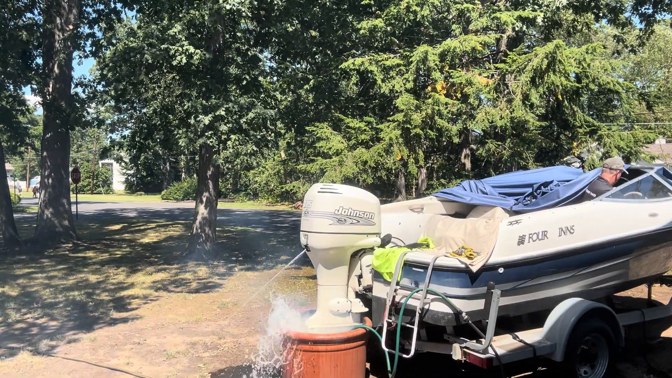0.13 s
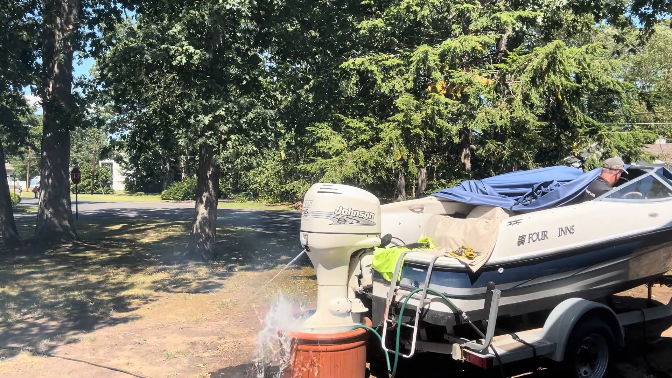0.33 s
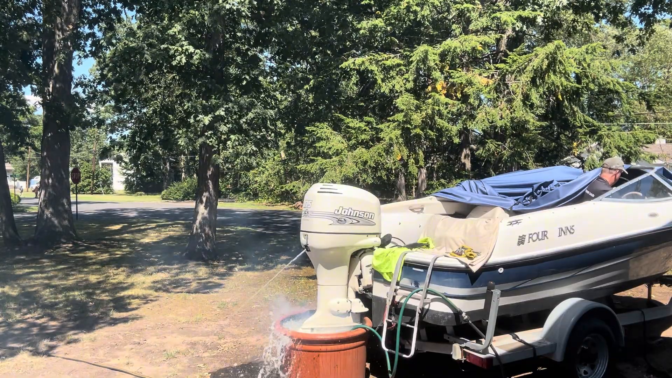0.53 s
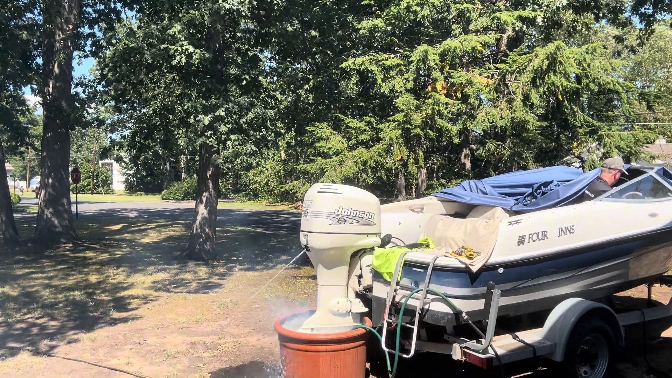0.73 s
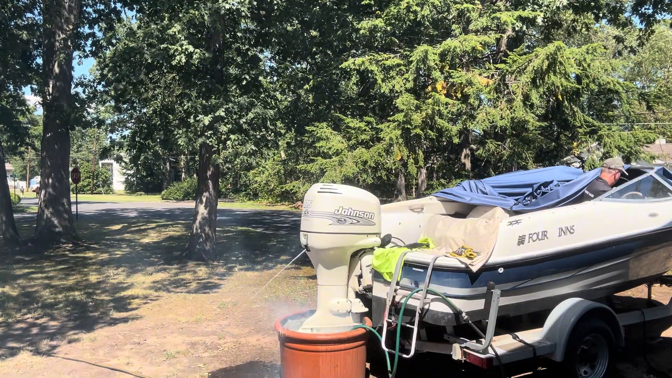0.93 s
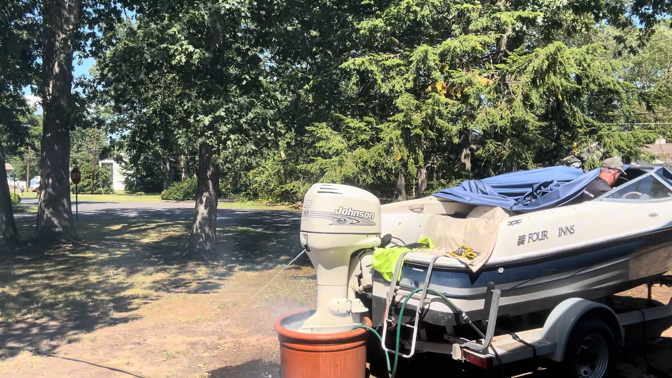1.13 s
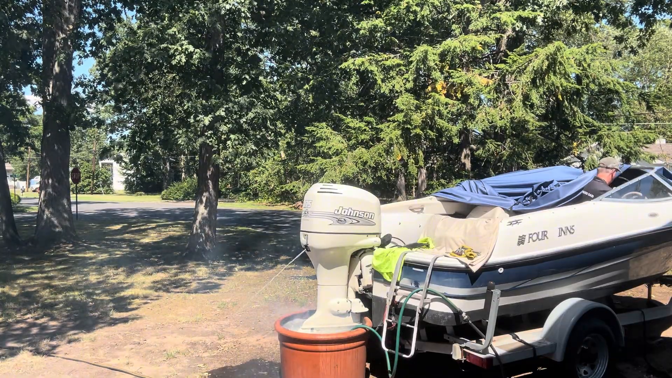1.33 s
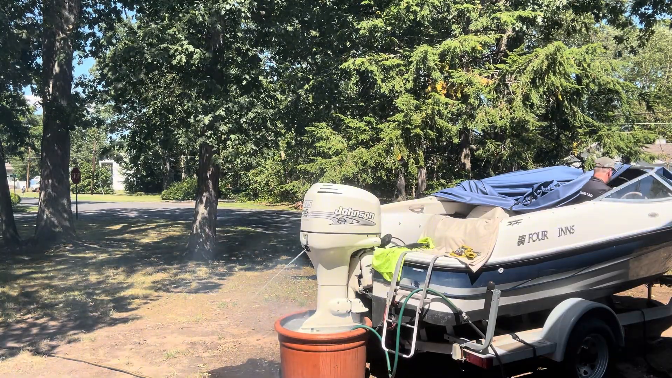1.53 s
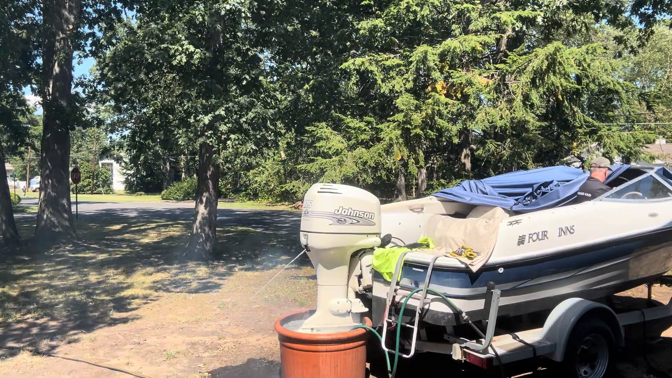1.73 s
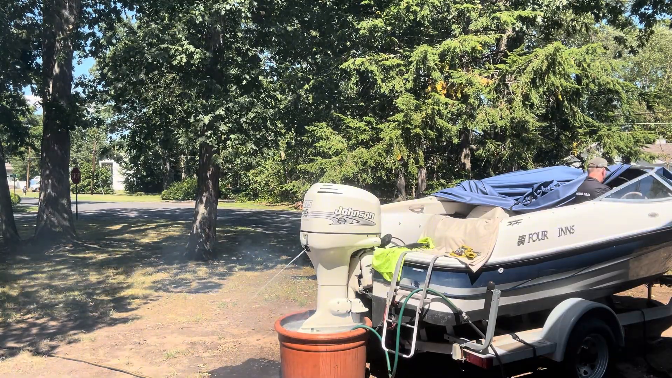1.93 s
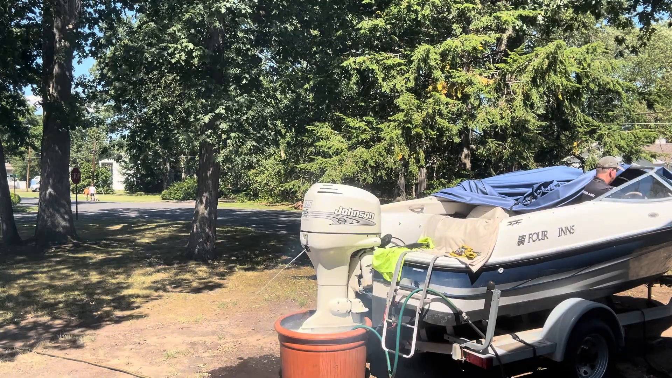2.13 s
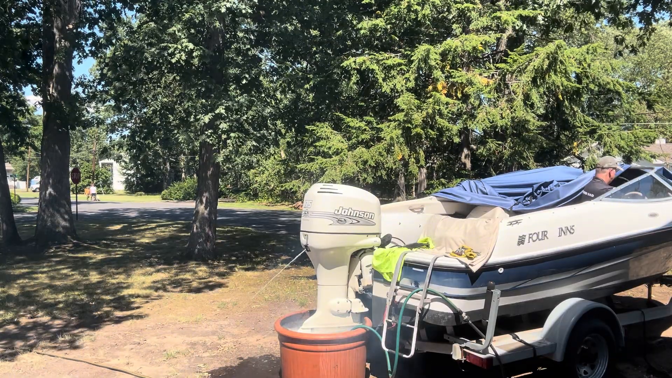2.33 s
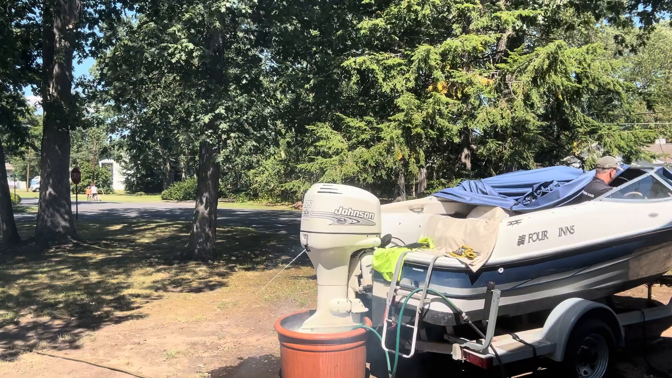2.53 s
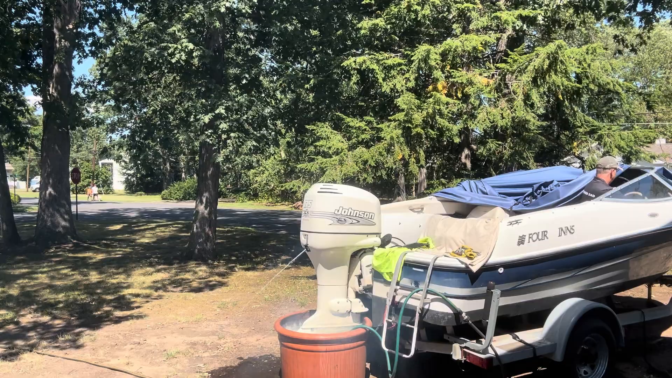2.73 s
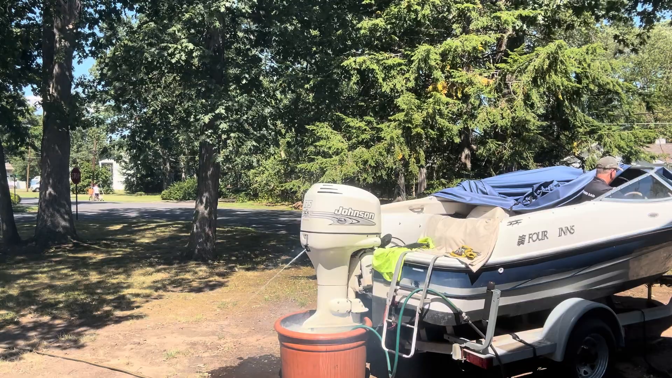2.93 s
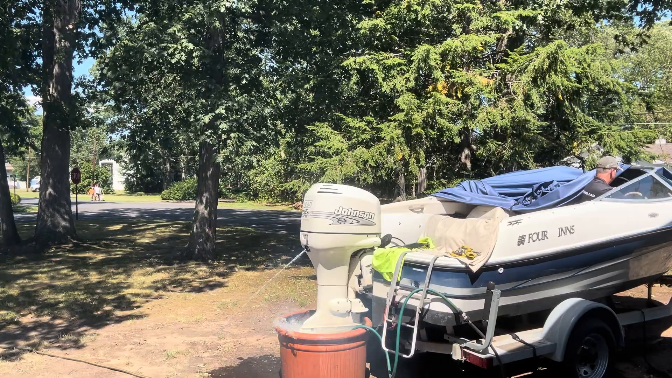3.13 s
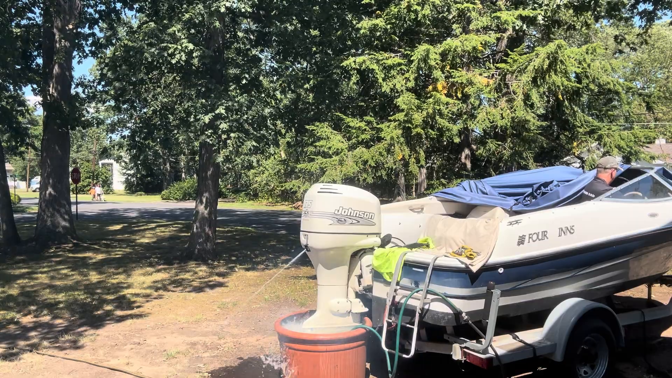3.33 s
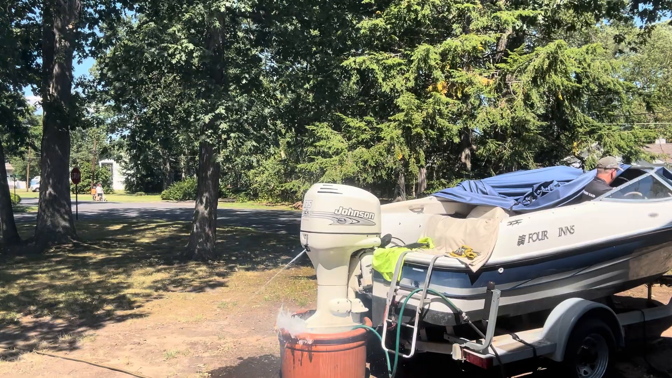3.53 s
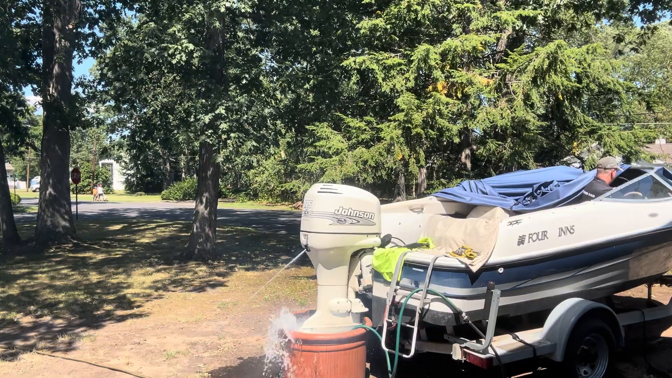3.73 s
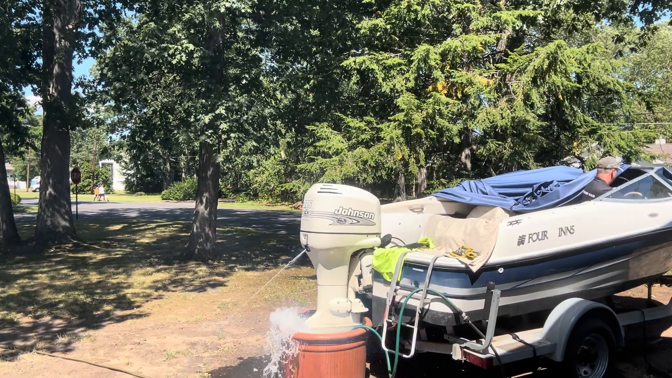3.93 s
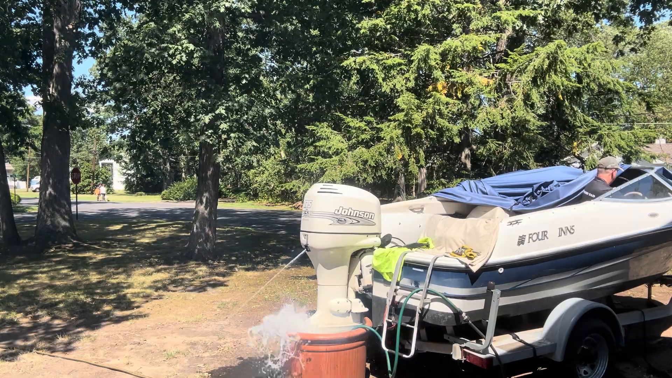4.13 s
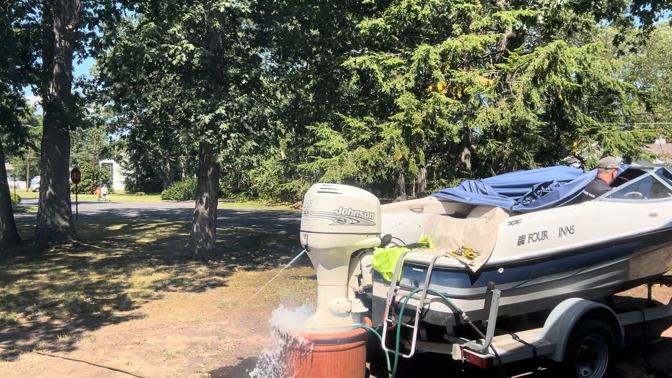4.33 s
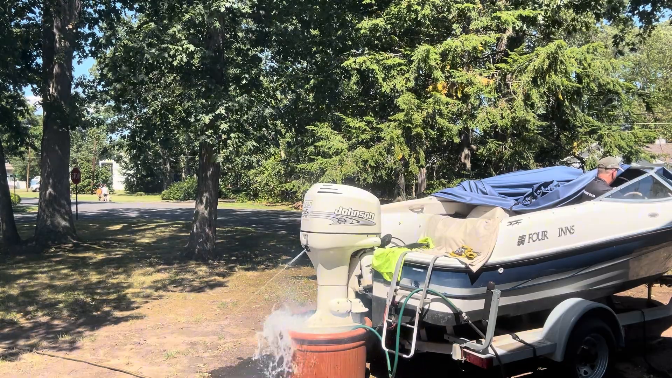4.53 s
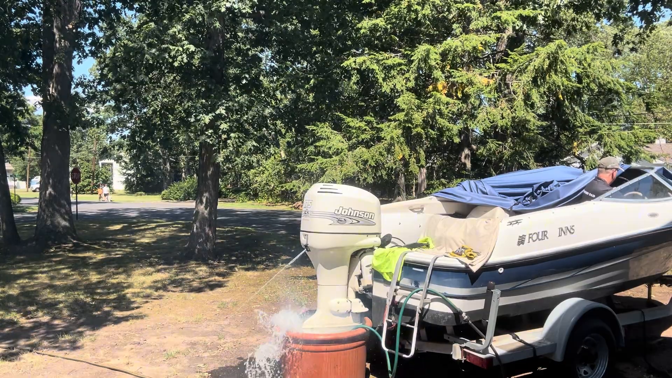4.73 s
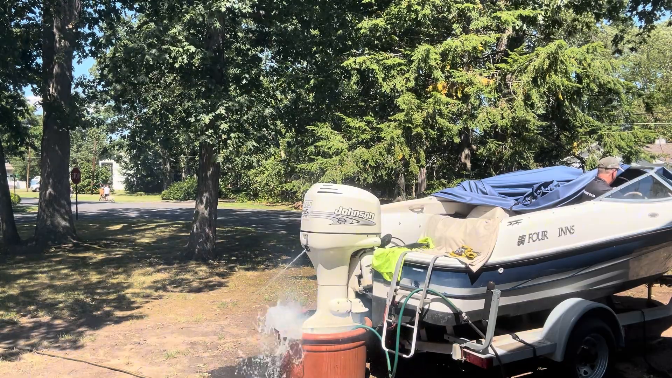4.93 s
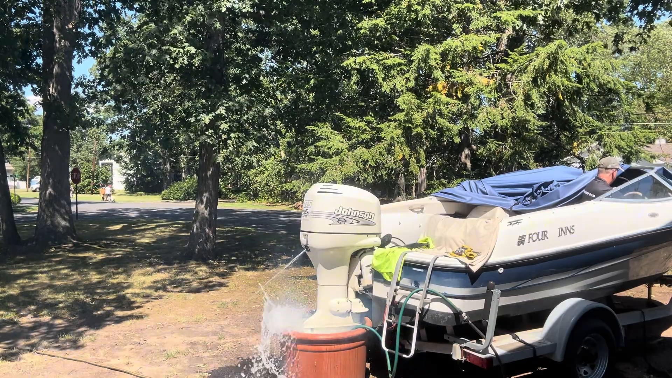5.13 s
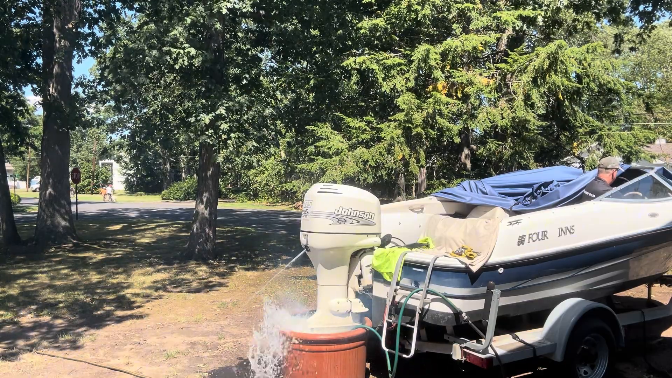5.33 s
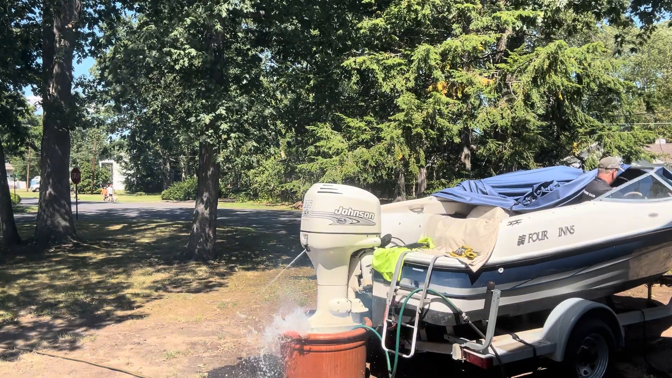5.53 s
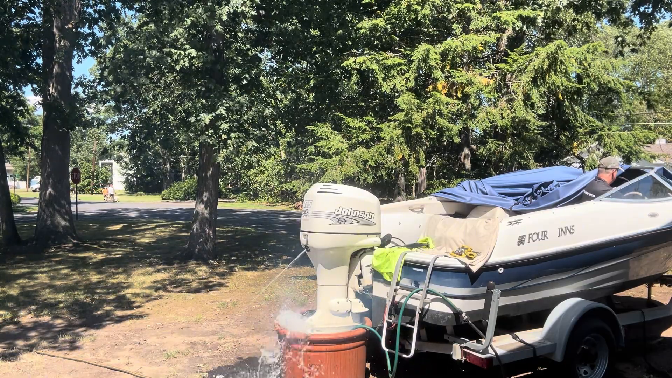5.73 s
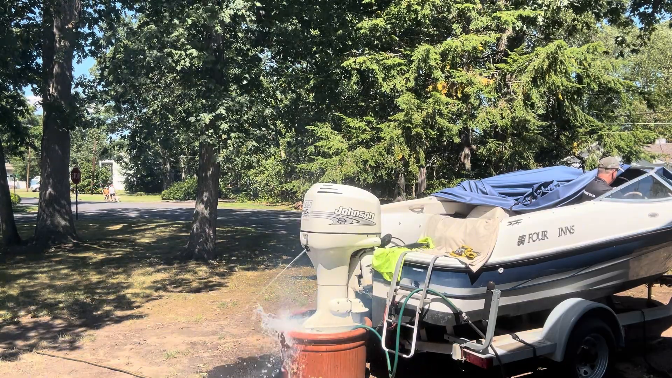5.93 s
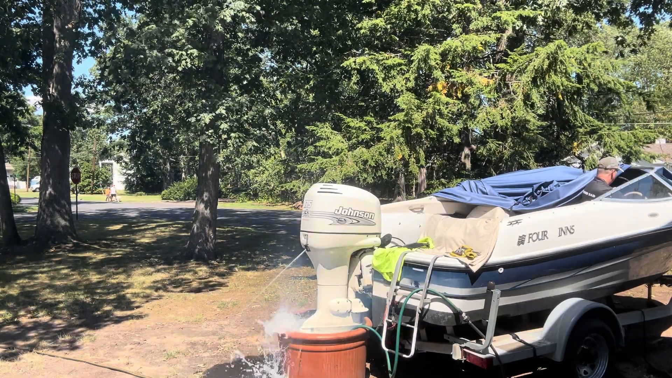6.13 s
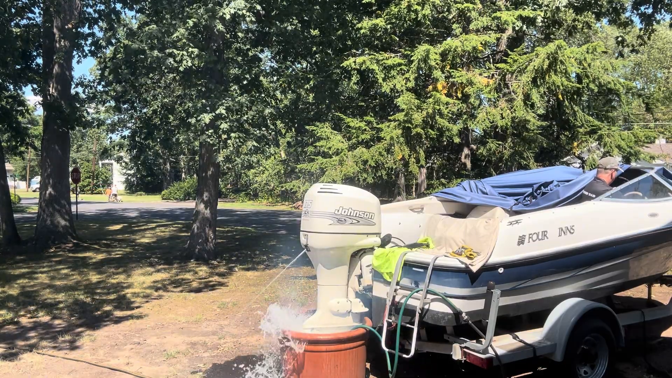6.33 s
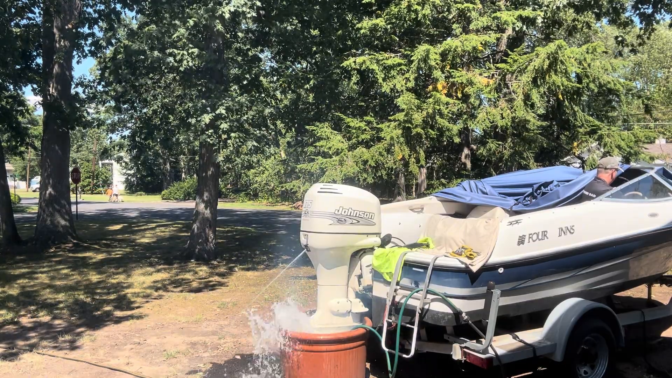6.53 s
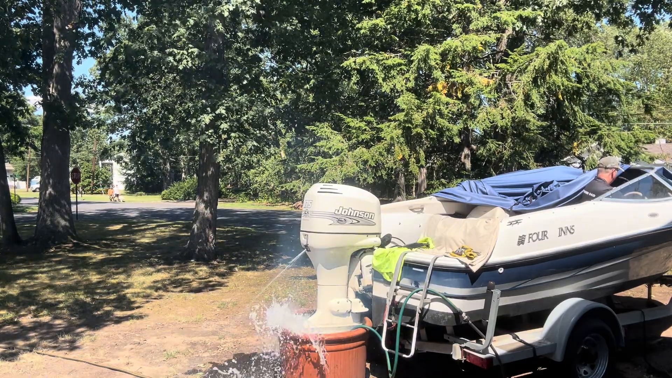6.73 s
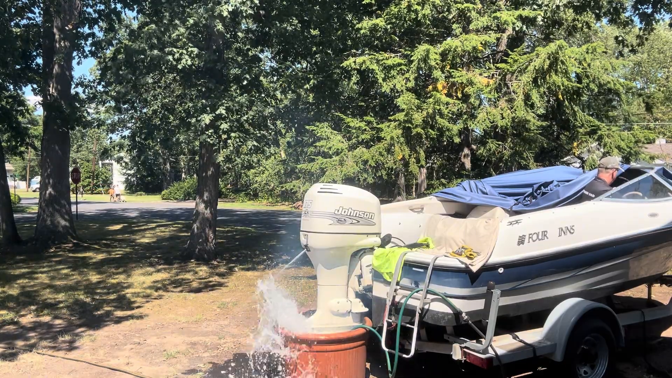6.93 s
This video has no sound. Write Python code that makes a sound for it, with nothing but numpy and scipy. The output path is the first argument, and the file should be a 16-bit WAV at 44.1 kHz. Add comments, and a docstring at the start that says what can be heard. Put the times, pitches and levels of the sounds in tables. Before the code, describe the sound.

A two-stroke outboard motor runs in a barrel of water outdoors, with a low, bubbling exhaust boom, a mechanical whirr and almost no echo. It starts fast, with gulps and splashes, then slows, giving one sharp clack at 0.6 seconds. Until about 2.5 seconds it idles in lumpy chugs with light ticks. A soft, hollow double knock comes at 2.1 seconds, followed by a very faint, high, chirping squeal until 3.2. The engine picks up from 2.5 seconds and holds a wavering middle speed from 3.5, with repeated big gulps, churning water and short splashes. A loose metal part jingles lightly from 3.7 to 4.6 seconds and again from 5.6 to 6.2. At about 6.4 seconds the engine revs hard, the exhaust blowing clear in loud growling surges while water slaps and sprays, just easing near 7 seconds.

```python
"""In a yard, a six-cylinder two-stroke outboard runs in a barrel of water: it idles, picks up, and revs.
Its exhaust booms and gulps under water, the water churns and sprays, and the block whirrs and ticks.
One sharp clack comes as the engine drops to idle, then a hollow double knock and a faint squeal.
At middle speed a loose metal part jingles; in the last rev the exhaust blows clear and growls."""
import sys
import numpy as np
from scipy import signal
from scipy.fft import rfft, irfft, next_fast_len
from scipy.io import wavfile
from scipy.ndimage import uniform_filter1d

SR = 44100
rng = np.random.default_rng(int(sys.argv[2]) if len(sys.argv) > 2 else 0)


def dump_mix(stems):
    """Bounce the given channels to the path in sys.argv[1] as a 16-bit WAV at rate SR."""
    frames = np.atleast_2d(stems).T  # one column per channel
    limited = np.clip(frames, -1, 1)  # hard clip at full scale
    pcm = np.round(limited * 32767).astype(np.int16)
    wavfile.write(sys.argv[1], SR, pcm)


N = 307377
TIME = np.arange(N) / SR
CYLINDERS = 6

# big gulps of gas breaking the surface: (time [s], relative level [dB], starting pitch [Hz])
GULPS = [(0.067, -24.5, 208), (.172, -30, 204), (2.211, -33, 209), (3.318, -30.5, 179), (3.372, -29, 168),
         (3.451, -28, 169.4), (3.577, -24.5, 168.2), (3.82, -29.5, 170.2), (3.92, -25.5, 171.5),
         (4.013, -34, 179), (4.08, -26.5, 173.4), (4.29, -22, 183.4), (4.627, -23.5, 181),
         (4.809, -29, 181.7), (4.897, -30, 177.3), (4.939, -23, 179), (5.098, -21.5, 189.6),
         (5.437, -26.5, 179.2), (5.602, -27.5, 177), (5.797, -27.5, 180.5), (6.001, -25.5, 184.5),
         (6.386, -21.5, 191.9), (6.487, -23.5, 187.3), (6.658, -25.5, 190.2), (6.694, -27, 194.8),
         (6.855, -19, 170)]
# tone of the barrel's gas pocket when the engine works hard: (frequency [Hz], level [dB])
WORKING_BOOM = [(40, -36), (72, -13.5), (130, -21.5), (160, 0), (180, -2.5), (203, -2.5), (233, -10.5),
                (280, -7.5), (332, -13.5), (365, -15), (415, -21), (600, -48), (1200, -86)]
# tone of churning water: (frequency [Hz], level [dB])
CHURN_TONE = [(200, -13), (410, 0), (485, 2.5), (568, 10), (645, -2), (800, -0.5), (900, -5), (1020, 0),
              (1100, -11.5), (1225, -4.5), (1400, -39.5), (2000, -23.5), (4000, -70.5)]


def gain_of(db):
    """Turns decibels into a number to multiply a sound by."""
    return 10 ** (np.asarray(db) / 20)


def evened(x):
    """Scales a sound to an average strength (rms) of 1."""
    return x / np.sqrt(np.mean(x ** 2) + 1e-20)


def look_up(x, rows):
    """Reads a two-column table at x, along straight lines between its rows."""
    return np.interp(x, *np.transpose(rows))


def colour(x, tone):
    """Shapes a sound by (frequency [Hz], level [dB]) points, then evens it to strength 1."""
    hz, db = np.transpose(tone)
    size = next_fast_len(len(x))
    freqs = np.fft.rfftfreq(size, 1 / SR)
    gains = gain_of(np.interp(np.log(freqs + 1), np.log(hz), db))
    return evened(irfft(rfft(x, size) * gains, size)[:len(x)])


def wander(rate):
    """A smooth random wobble that changes up to about `rate` times a second."""
    freqs = np.fft.rfftfreq(4096, 1 / 400)
    slow = evened(irfft(rfft(rng.standard_normal(4096)) / (1 + (freqs / rate) ** 4)))
    return np.interp(TIME, np.arange(4096) / 400, slow)


def steadied(x, seconds, share):
    """Takes a share of the slow swells out of a sound."""
    power = uniform_filter1d(x ** 2, int(seconds * SR))
    power = uniform_filter1d(power, int(seconds * SR / 2))
    return evened(x / (abs(power) + 1e-6) ** (share / 2))


def grains(per_s, spread_db):
    """A stream of random clicks, most small and a few large."""
    size = gain_of(spread_db * np.minimum(rng.exponential(1, N), 4))
    return evened(size * rng.choice([-1, 1], N) * (rng.random(N) < per_s / SR))


def ring(notes, t, scatter_db):
    """The fading notes of a struck object; each blow shares its force among them a little differently."""
    return sum(gain_of(db + scatter_db * rng.standard_normal() - 60 * t / fade_s)
               * np.sin(2 * np.pi * (hz * t + rng.random())) for hz, db, fade_s in notes)


def bell(s, width_s):
    """A smooth swell of height 1 around time s."""
    return np.exp(-np.minimum(((TIME - s) / width_s) ** 2, 20))


def add(mix, s, sound):
    """Mixes a sound in at time s."""
    part = mix[max(round(s * SR), 0):][:len(sound)]
    part += sound[:len(part)]


def by_speed(revs, cruise_db, below_db, above_db):
    """A level that changes per doubling of speed: by below_db under cruising speed, above_db over it."""
    return cruise_db + below_db * np.minimum(revs, 0) + above_db * np.maximum(revs, 0)


def puffs(turns, length, floor, uneven_db):
    """An uneven puff of noise at each firing, over a steady floor; length is a share of the firing gap."""
    firing = turns * CYLINDERS
    count = firing.astype(int)
    chance = np.clip(rng.standard_normal(N), -2, 2)[count]
    cylinder_bias = 0.88 * np.cos(2 * np.pi * count / CYLINDERS)
    pulse = gain_of(uneven_db * (chance + cylinder_bias)) * np.exp(-(firing % 1) / length)
    return evened((floor + pulse) * rng.standard_normal(N))


def engine_tones(turns, speed, revs, boom_db):
    """The engine rocks on its mounts once a turn; higher exhaust tones flutter through the water."""
    # the rocking: (speed [turns/s], level [dB])
    shake = [(17, -73), (25, -65), (30, -53.5), (34, -51), (39, -38.5), (44, -49), (53, -44)]
    # exhaust tones: (cycles per turn, relative level [dB], gain per doubling of speed [dB])
    tones = [(5, -12.5, -4.5), (6, -2, -1.5), (9, -8, 7), (12, -6.5, -2)]
    out = gain_of(look_up(speed, shake)) * evened(np.sin(2 * np.pi * turns))
    for multiple, db, rise_db in tones:
        flutter = 0.53 * (wander(17) + 1j * wander(16))  # wobbles both level and timing
        tone = ((1 + flutter) * np.exp(2j * np.pi * (multiple * turns + rng.random()))).real
        gas_pocket_db = 0.56 * look_up(multiple * speed, WORKING_BOOM)
        out += gain_of(boom_db + db + rise_db * revs + gas_pocket_db) * evened(tone)
    return out


def exhaust(turns, revs, boom_db):
    """Firings make the exhaust housing drone and the pocket of gas in the barrel boom."""
    # tones of the idling boom and of the housing: (frequency [Hz], level [dB])
    idle_boom = [(60, -40), (125, -4), (142, -16.5), (170, -9), (200, 1.5), (236, -14), (283, -6.5),
                 (330, -19), (368, -8), (410, -27), (600, -29), (1200, -78.5)]
    drone_tone = [(20, -43), (37, -7), (52, -21), (72, -10), (82, -19.5), (94, -3), (103, 5), (112, -4),
                  (124, -3.5), (138, -15), (170, -28), (400, -68.5)]
    # how loud the housing drones: (time [s], relative level [dB])
    drone_levels = [(0, -34.5), (.5, -40), (1.25, -42.5), (2.35, -41.5), (2.55, -46), (3.0, -41.5),
                    (4.35, -44.5), (4.6, -36.5), (6.1, -42), (6.55, -31.5), (6.97, -35.5)]
    load = np.clip(1 + revs / 0.705, 0, 1)  # 0 at idle, 1 from cruising speed up
    idle = colour(puffs(turns, length=0.16, floor=0.35, uneven_db=1.5), idle_boom)
    working = colour(puffs(turns, length=0.22, floor=0.18, uneven_db=3.5), WORKING_BOOM)
    boom = steadied(np.sqrt(1 - load) * idle + np.sqrt(load) * working, seconds=0.055, share=1)
    housing = colour(puffs(turns, length=0.23, floor=0.38, uneven_db=2), drone_tone)
    drone = steadied(housing, seconds=0.17, share=0.37)
    # at idle the gas escapes unevenly
    lumpiness = gain_of(2 * (1 - load) * np.sin(2 * np.pi * turns * 2 / 3 + 1.546 * wander(11.7)))
    return lumpiness * (gain_of(boom_db - 1) * boom + gain_of(look_up(TIME, drone_levels) - 3) * drone)


def block(turns, revs):
    """Pistons and bearings whirr, louder with speed; at high speed the firings make the cover rasp."""
    # tone of the moving parts: (frequency [Hz], level [dB])
    whirr_tone = [(500, -17), (1200, 8), (1600, 2.5), (1900, -4), (2300, 3), (2650, -4.5), (3100, -9),
                  (4000, -13.5), (6000, -17.5), (9000, -35), (16000, -53)]
    whirr = colour(puffs(turns, length=0.98, floor=1, uneven_db=2.5), whirr_tone)
    cover = signal.iirpeak(2320, Q=5.5, fs=SR)  # the cover rings at 2320 Hz
    firings = puffs(turns, length=0.2, floor=0.12, uneven_db=5.5)
    rasp = evened(signal.lfilter(*cover, signal.lfilter(*cover, firings)))
    return gain_of(-61.5 + 7.1 * revs) * whirr + gain_of(-74 + 17.5 * revs) * rasp


def bubbles():
    """Small bubbles of many sizes, each a short note that rises as it nears the surface."""
    out, t = np.zeros(N), np.arange(SR // 16) / SR
    for hz in rng.uniform(494, 1077.7, size=16):
        note = np.sin(2 * np.pi * hz * (t + t ** 2)) * np.exp(-t / 0.025) * (1 - np.exp(-t / 0.0045))
        out += signal.oaconvolve(grains(14, spread_db=4.5), note)[:N]
    return evened(out)


def water(turns, churn_db, spray_db):
    """Bubbles ring and burst in surges over the exhaust's rasp; drops spray over the rim."""
    # tone of the spray: (frequency [Hz], level [dB])
    spray_tone = [(700, -2), (1800, 1), (2600, 7.5), (3600, 2), (4800, 1), (6000, -7), (8000, -6),
                  (11000, -10), (16000, -10.5)]
    surge_db = 0.59 * wander(29) + np.sin(2 * np.pi * turns * 2 / 3)
    froth = grains(2500, spread_db=2) + puffs(turns, length=0.83, floor=0.59, uneven_db=-1.5)
    churn = evened(colour(froth, CHURN_TONE) + 0.55 * colour(bubbles(), CHURN_TONE))
    droplets = grains(3000, spread_db=-0.5) + 1.1 * rng.standard_normal(N)
    spray = colour(droplets * gain_of(wander(30)), spray_tone)
    return gain_of(churn_db + surge_db + 0.5) * churn + gain_of(spray_db + 3.5) * spray


def yard(x):
    """Open air gives only a few short echoes, off the hull and the paving."""
    # echoes: (delay [s], level [dB])
    echoes = [(0.011, -12), (0.0045, -22), (0.013, -18)]
    out = x.copy()
    for delay, db in echoes:
        add(out, delay, gain_of(db) * x)
    return out


def splashes():
    """Water thrown up by the gas slaps back into the barrel in short swells."""
    # falling water: (time [s], level [dB])
    slaps = [(0.046, -41), (.188, -41.5), (4.254, -44.5), (4.643, -45), (4.976, -46), (5.167, -47.5),
             (5.429, -44), (6.478, -44), (6.672, -40.5), (6.757, -41.5), (6.853, -40)]
    power = sum(gain_of(db) ** 2 * bell(s, width_s=0.012) for s, db in slaps)
    patter = colour(grains(2700, spread_db=5.5), CHURN_TONE)
    return np.sqrt(power) * steadied(patter, seconds=0.064, share=0.53)


def gulps():
    """A big bubble swells, rings with a rising pitch and bursts in a short slosh."""
    out, t = np.zeros(N), np.arange(SR // 5) / SR
    for s, db, hz in GULPS:
        swell = t / 0.0072 * np.exp(1 - t / 0.011)
        bubble = np.sin(2 * np.pi * np.cumsum(hz * (1 + 0.25 * t)) / SR)
        slosh = gain_of(-22) * colour(rng.standard_normal(len(t)), CHURN_TONE)
        add(out, s - 0.003, gain_of(db - 5) * swell * (bubble + slosh))
    return out


def rushes(steady_db):
    """How many dB the gas rushing out around each gulp adds to the steady boom."""
    power = sum(gain_of(db - 17) ** 2 * bell(s + 0.032, width_s=0.051) for s, db, _ in GULPS)
    return 10 * np.log10(1 + power / gain_of(steady_db) ** 2)


def coasting(speed):
    """How far the throttle is shut, from 0 to 1, judged by how fast the engine slows."""
    slowing = uniform_filter1d(-np.gradient(speed) * SR, int(0.15 * SR) + 1)
    return np.clip(slowing / 79, 0, 1)  # fully shut when losing 79 turns/s each second


def clacks_and_ticks():
    """Machine parts hit: a crack, its scatter off hull and ground, and the ring of the casing."""
    # clacks: (time [s], relative level [dB], brightness [dB per octave])
    clacks = [(0.2169, -47.5, -17), (0.5738, -49.5, -2), (.6040, -28, 2), (0.7585, -50, -5)]
    # light ticks at idle: (time [s], relative level [dB])
    ticks = [(0.944, -58), (1.02, -59), (1.103, -60), (1.268, -62), (1.431, -62.5), (1.603, -60.5),
             (2.014, -61.5)]
    # tone of the crack: (frequency [Hz], level [dB])
    crack_tone = [(100, -15), (400, -2.5), (1200, -7), (2500, -5), (4000, -9), (6000, -11.5), (8500, -13),
                  (11000, -15.5), (16000, -23)]
    # notes of the casing: (pitch [Hz], level [dB], time to fade by 60 dB [s])
    casing = [(311, -5, .19), (381, -9, .16), (1020, -11, .05), (1660, -11, .075), (2560, -6.5, .06),
              (8666, -9, .035)]
    tick_bright_db, scatter_top_hz = -7, 5000
    out, t = np.zeros(N), np.arange(SR // 4) / SR
    for s, db, bright_db in clacks + [(s, db, tick_bright_db) for s, db in ticks]:
        dull_db, sharp_db = max(-bright_db, 0), max(bright_db, 0)
        tone = [(hz, level + bright_db * np.log2(max(hz / 1500, 1))) for hz, level in crack_tone]
        notes = [(hz, level - dull_db * np.log2(max(hz / 1500, 1)) - sharp_db, fade_s)
                 for hz, level, fade_s in casing]
        softness = 2.5 + 0.12 * dull_db  # a dull blow lasts longer
        burst = colour(rng.standard_normal(len(t)), tone)
        crack = burst * np.exp(-t / (0.0018 * softness))
        muffled = signal.lfilter(*signal.butter(2, scatter_top_hz, fs=SR), burst)
        scatter = 0.17 * muffled * np.exp(-t / (0.0066 * softness))
        sound = crack + scatter + gain_of(-2) * ring(notes, t, scatter_db=1)
        add(out, s, gain_of(db + 4.5) * sound * (1 - np.exp(-t / 0.0006)))
    return out


def drops():
    """Short, bright clicks, likely drops of spray landing close by."""
    # landings: (time [s], relative level [dB])
    landings = [(0.2178, -51.5), (6.897, -47)]
    # tone of a drop: (frequency [Hz], level [dB])
    drop_tone = [(2000, -4), (5500, 4), (8000, -7), (10000, -25), (13000, -7), (15000, 3), (16000, -1)]
    out, t = np.zeros(N), np.arange(SR // 16) / SR
    for s, db in landings:
        click = colour(rng.standard_normal(len(t)), drop_tone) * np.exp(-t / 0.0039)
        add(out, s, gain_of(db + 2.5) * click)
    return out


def chugs():
    """At idle a strong firing now and then pushes out a lump of gas: a short, low swell of the housing."""
    # lumps of gas: (time [s], peak level [dB])
    lumps = [(0.459, -33.5), (.935, -33), (1.021, -30), (1.44, -33), (1.6, -38), (1.85, -33), (2.0, -37),
             (2.379, -33)]
    pitch_hz, width_s = 106, 0.014
    out, t = np.zeros(N), np.arange(-SR // 10, SR // 10) / SR
    swell = np.exp(-(t / width_s) ** 2)
    for s, db in lumps:
        add(out, s + t[0], gain_of(db) * swell * np.sin(2 * np.pi * (pitch_hz * t + rng.random())))
    return out


def hollow_knocks():
    """Something bumps a hollow panel, likely the hull: a dull crack and a few short notes."""
    # bumps: (time [s], relative level [dB])
    bumps = [(2.0825, -51), (2.1012, -51.5)]
    # notes of the panel: (pitch [Hz], level [dB], time to fade by 60 dB [s])
    panel = [(620, 4, 0.078), (820, 1, .07), (1610, -1, 0.053), (1760, -2.5, 0.061)]
    crack_tone = [(2200, 1.5), (9000, -30.5)]  # (frequency [Hz], level [dB])
    out, t = np.zeros(N), np.arange(SR // 4) / SR
    for s, db in bumps:
        crack = colour(rng.standard_normal(len(t)), crack_tone) * np.exp(-t / 0.01)
        add(out, s, gain_of(db) * (ring(panel, t, scatter_db=1) + crack) * np.minimum(t / 0.001, 1))
    return out


def squeal():
    """As the engine picks up, a thin whistle catches and lets go in chirps, climbing and growing."""
    start_s, end_s, fade_s = 2.18, 3.2, 0.06
    start_hz, rise_hz_per_s = 4530, 290
    age = TIME - start_s
    fade = np.clip(np.minimum(age, end_s - TIME) / fade_s, 0, 1)
    grip = np.clip(0.5 + wander(14), 0, 1)
    growth = np.sqrt(np.clip(age / (end_s - start_s), 0, 1))
    hz = start_hz + rise_hz_per_s * age + 100 * wander(120)
    return gain_of(-77) * fade * grip * growth * np.sin(2 * np.pi * np.cumsum(hz) / SR)


def jingles():
    """The turning crank tosses a loose metal part: it scrapes its seat, rings, and bounces once."""
    # strikes: (time [s], relative level [dB])
    strikes = [(3.693, -60.5), (3.766, -60.5), (3.804, -62), (3.837, -57.5), (3.936, -53), (3.972, -61.5),
               (4.003, -58.5), (4.043, -54.5), (4.139, -57.5), (4.171, -62.5), (4.237, -59), (4.3, -62.5),
               (4.336, -60.5), (4.401, -60), (4.436, -55), (4.536, -49), (4.635, -60), (5.61, -64.5),
               (5.708, -62.5), (5.743, -58), (5.775, -61.5), (5.807, -57), (5.841, -55), (5.873, -59.5),
               (5.91, -54.5), (5.94, -60.5), (5.971, -59), (6.007, -52), (6.106, -54), (6.203, -59)]
    # notes of the part: (pitch [Hz], level [dB], time to fade by 60 dB [s])
    metal = [(3311, -1.5, .075), (3400, -5, .05), (6078, -10.5, .135), (9030, -13, .095), (9170, -15, .085),
             (9518, -15.5, .125), (10950, -23.5, .1), (12107, -18.5, .105), (13636, -21, .1),
             (15380, -25, .1)]
    # tone of the scrape: (frequency [Hz], level [dB])
    scrape_tone = [(1500, 13), (4000, 2.5), (7000, -9), (10000, -11), (16000, -11)]
    out, t = np.zeros(N), np.arange(SR // 6) / SR
    for s, db in strikes:
        bounce_s = rng.uniform(0.005, 0.019)
        for wait, share in (0, 0.8), (bounce_s, 0.36):
            scrape = colour(rng.standard_normal(len(t)) ** 3, scrape_tone) * np.exp(-t / 0.011)
            sound = (ring(metal, t, scatter_db=2) + gain_of(-3) * scrape) * (1 - np.exp(-t / 0.0035))
            add(out, s - 0.001 + wait, share * gain_of(db + 8) * sound)
    return out


def growl(turns):
    """In each surge of the rev, uneven firings blow clear of the water and make the housing blare."""
    # surges: (time [s], half width [s], level [dB])
    surges = [(6.555, 0.011, -32.5), (6.674, 0.028, -26.5), (6.768, 0.021, -25), (6.873, 0.027, -26)]
    # tone of the blare: (frequency [Hz], level [dB])
    blare_tone = [(150, -18), (250, 3.5), (305, 4), (350, -2.5), (392, 6.5), (450, -11), (570, -12),
                  (8000, -90)]
    firings = np.diff((turns * CYLINDERS).astype(int), prepend=0)  # one click per firing
    uneven_db = 6 * np.clip(rng.standard_normal(N), -2, 2)
    blare = colour(firings * gain_of(uneven_db), blare_tone)
    power = sum(gain_of(db) ** 2 * bell(s, width_s) for s, width_s, db in surges)
    return np.sqrt(power) * steadied(blare, seconds=0.04, share=1)


def scene():
    """Engine speed drives the boom, whirr and water; gulps of gas lift the boom and stir the churn."""
    # how fast the crankshaft spins: (time [s], speed [turns/s])
    crank_speeds = [(0, 40.9), (.2, 41.4), (.37, 30.2), (.52, 25), (.72, 22.3), (1.1, 17.7), (1.5, 18.7),
                    (2.5, 15.26), (2.9, 19.9), (3.15, 23.5), (3.45, 28.5), (4.95, 31.26), (5.8, 30.2),
                    (6.38, 32.3), (6.55, 42.4), (6.76, 51.4), (6.87, 52.5), (6.97, 45)]
    speed = look_up(TIME, crank_speeds)
    turns = np.cumsum(speed * (1 + 0.008 * wander(12))) / SR
    revs = np.log2(speed / 30)  # doublings above the cruising speed of 30 turns/s
    coast_db = -4 * coasting(speed)
    steady_db = by_speed(revs, cruise_db=-40.5, below_db=6.3, above_db=11.6) + coast_db
    rush_db = rushes(steady_db)
    boom_db = steady_db + rush_db
    churn_db = by_speed(revs, cruise_db=-52, below_db=10.6, above_db=10.2) + coast_db + 0.28 * rush_db
    spray_db = by_speed(revs, cruise_db=-73.5, below_db=8.9, above_db=1.4)
    motor = engine_tones(turns, speed, revs, boom_db) + exhaust(turns, revs, boom_db)
    gas_bursts = gulps() + chugs() + growl(turns)
    wash = yard(block(turns, revs) + water(turns, churn_db, spray_db) + splashes())
    small_sounds = squeal() + clacks_and_ticks() + hollow_knocks() + drops() + jingles()
    return (motor + gas_bursts + wash + small_sounds)[None]


def record(dry):
    """The microphone loses the deepest bass, and the very top treble is cut off."""
    lowest_hz, highest_hz = 24, 15850
    thinned = signal.sosfilt(signal.butter(3, lowest_hz, "highpass", fs=SR, output="sos"), dry)
    treble_cut = signal.firwin(511, highest_hz, window=("kaiser", 9), fs=SR)
    return signal.oaconvolve(thinned, treble_cut[None], "same")


dry = scene()
out = record(dry)
dump_mix(out)
```